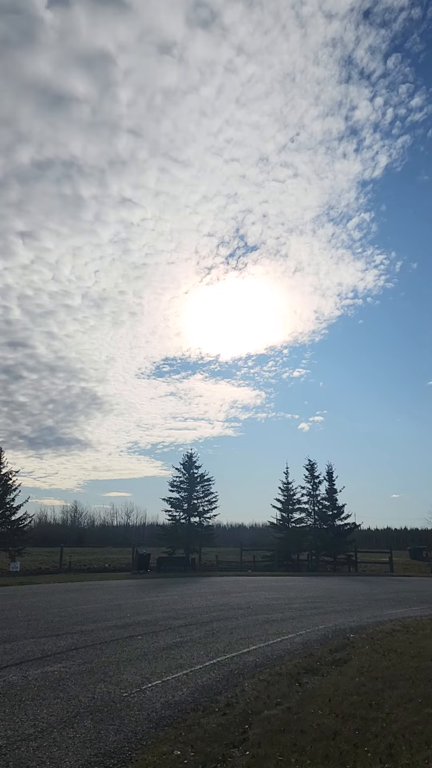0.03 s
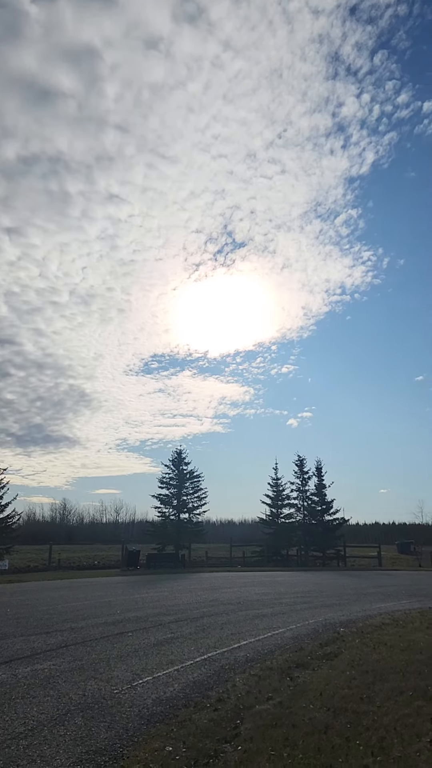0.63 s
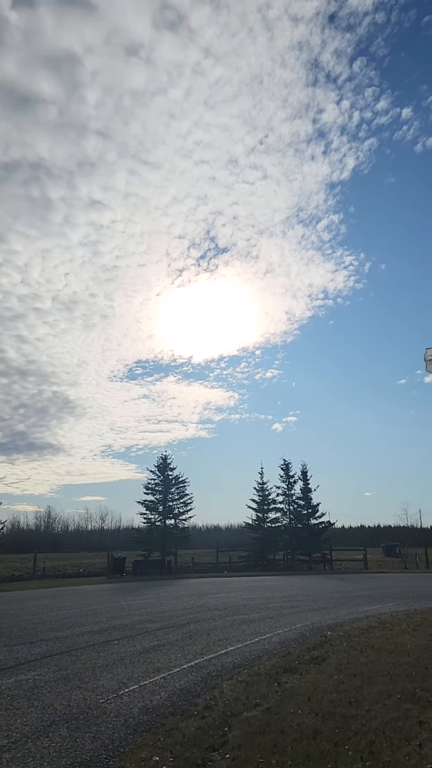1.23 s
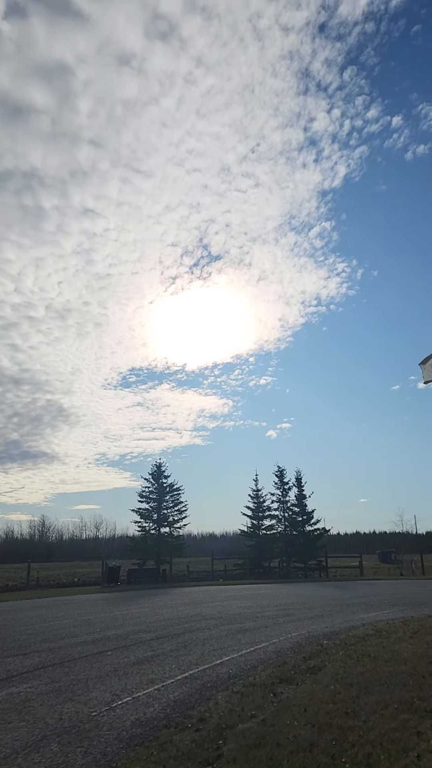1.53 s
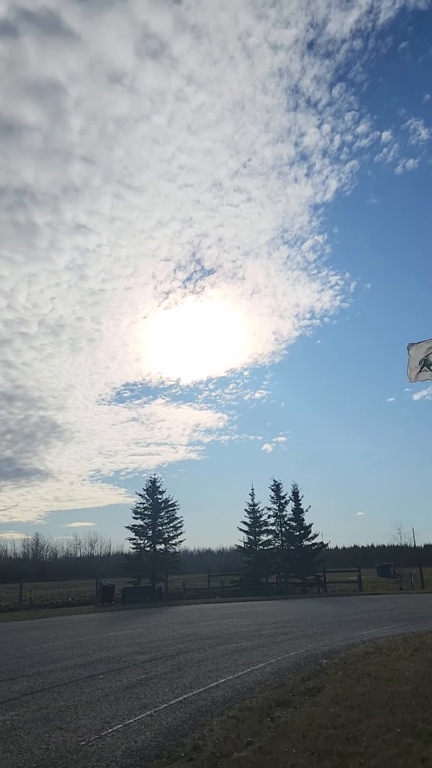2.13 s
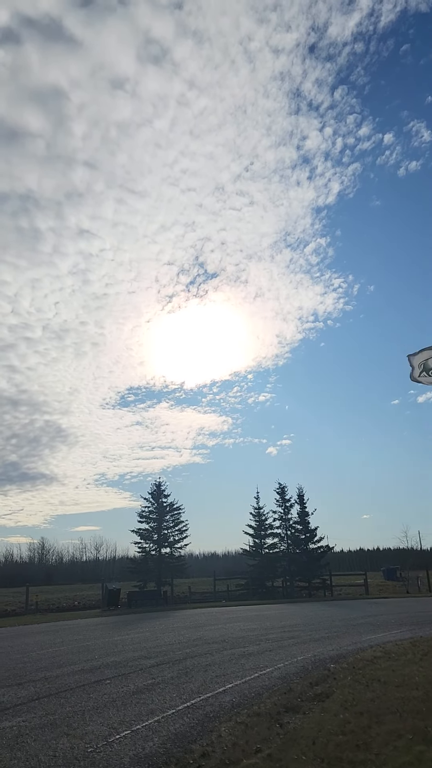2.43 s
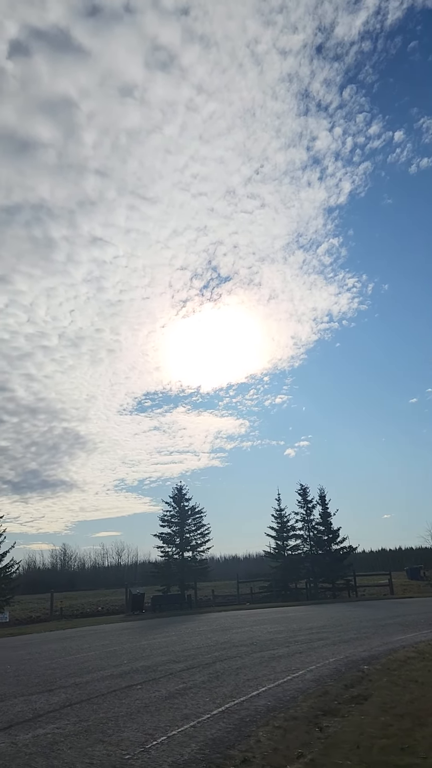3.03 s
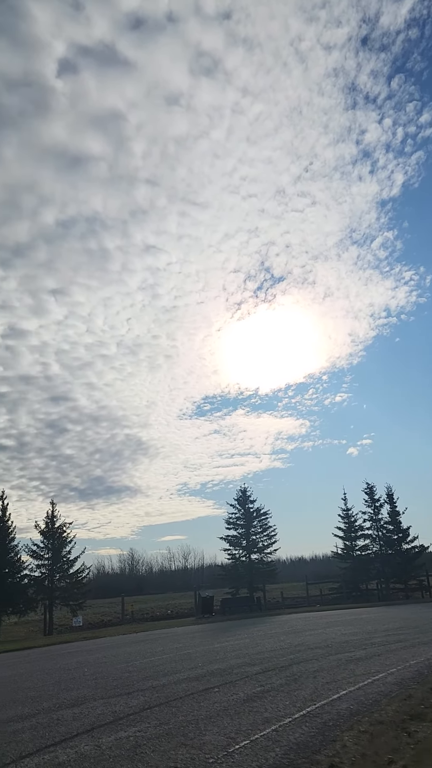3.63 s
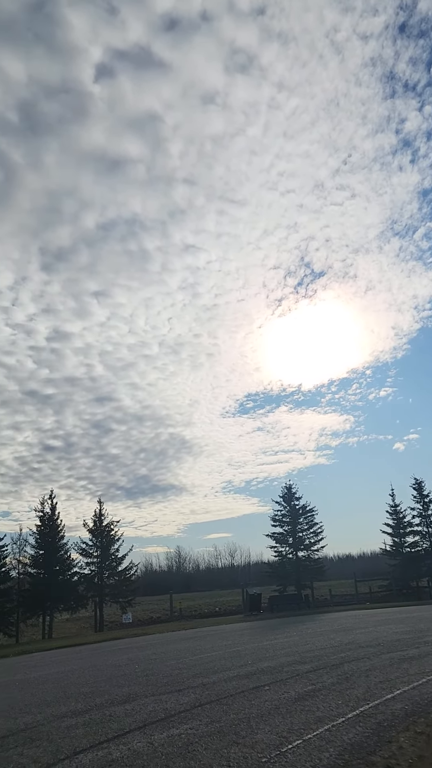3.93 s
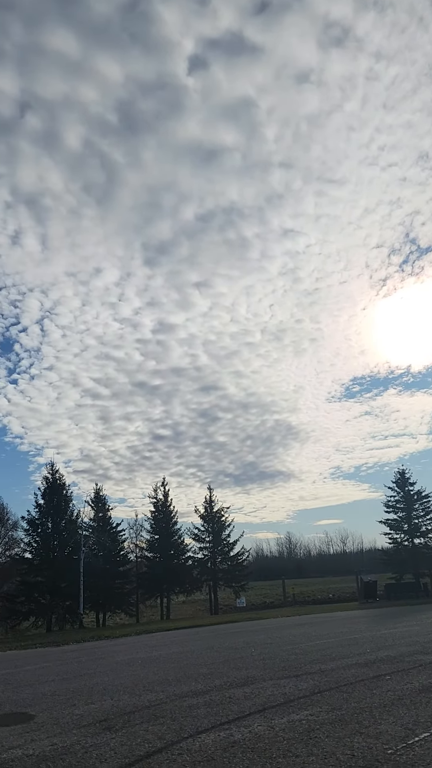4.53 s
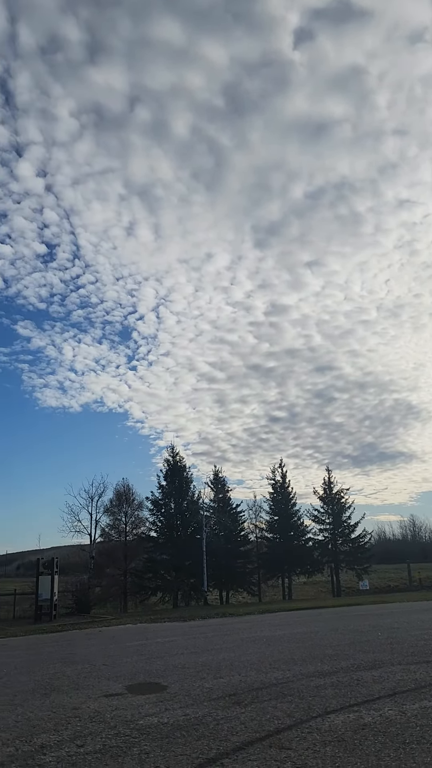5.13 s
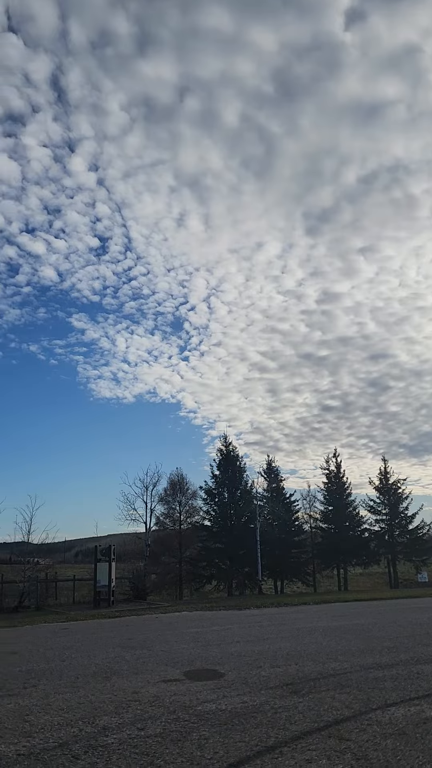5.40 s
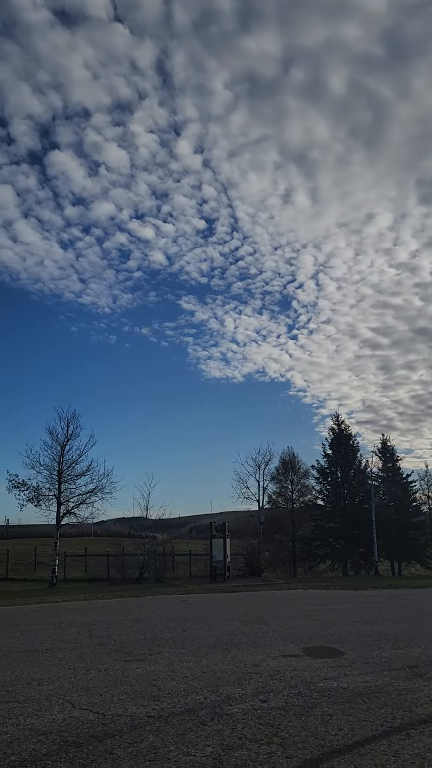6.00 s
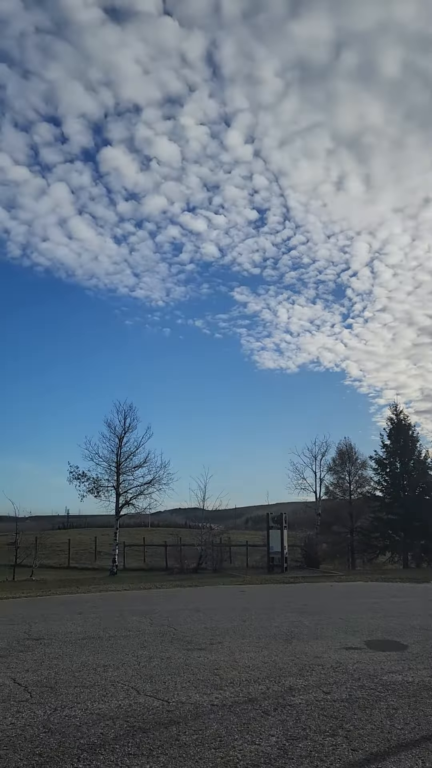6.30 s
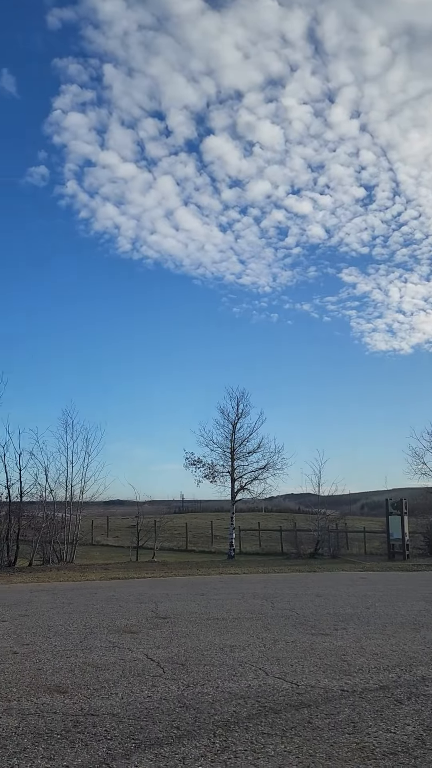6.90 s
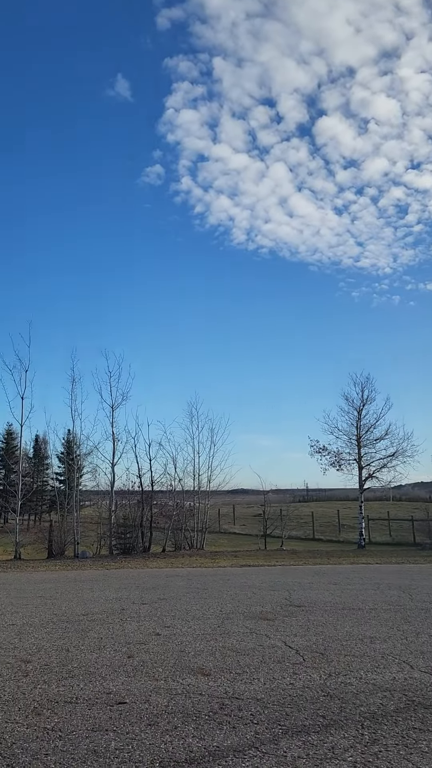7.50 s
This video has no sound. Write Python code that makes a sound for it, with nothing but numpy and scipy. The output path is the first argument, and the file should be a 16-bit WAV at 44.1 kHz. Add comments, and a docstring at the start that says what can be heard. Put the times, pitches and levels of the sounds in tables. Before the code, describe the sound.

Outdoors in open country, low gusty wind buffets a handheld microphone while a rope and its clips keep knocking against a metal flagpole nearby. The strikes come unevenly, several a second, some sharp and ringing, others light taps, and they grow sparser near the end. Dull handling thumps come early, a dry tap on the device follows midway, and clothing rustles and ticks softly right beside the microphone.

```python
"""Metal clips on a wind-swung halyard clank against a hollow metal flagpole a few metres off.
Each strike rings the tube's modes, with a clink, a hollow knock and a dry crack; the slack rope taps
in between. The phone turns away from the pole while gusts rumble on its ports. Close by, fingers bump
and tap the case and cloth rustles and ticks. A faint hush of wind lies over the open field."""
import sys
import numpy as np
from scipy import signal
from scipy.fft import rfft, irfft, next_fast_len
from scipy.io import wavfile
from scipy.ndimage import uniform_filter1d

SR = 44100
rng = np.random.default_rng(int(sys.argv[2]) if len(sys.argv) > 2 else 0)


def write(x):
    x = np.atleast_2d(x).T
    wavfile.write(sys.argv[1], SR, np.round(np.clip(x, -1, 1) * 32767).astype(np.int16))


N = 341775
TIME_S = np.arange(N) / SR


def undb(db):
    """Decibels to gain."""
    return 10 ** (np.asarray(db) / 20)


def unit(x):
    """Scale to rms 1."""
    return x / np.sqrt(np.mean(x ** 2))


def curve(table, column=1):
    """Table column, linear in time."""
    return np.interp(TIME_S, np.array(table)[:, 0], np.array(table)[:, column])


def at_hz(table, hz, column=1):
    """Table column, read on a log-frequency axis."""
    return np.interp(np.log(hz + 1), np.log(np.array(table)[:, 0]), np.array(table)[:, column])


def colour(x, spectrum):
    """Filter by (frequency [Hz], level [dB]) points, then scale to rms 1."""
    size = next_fast_len(x.shape[-1])
    gain = undb(at_hz(spectrum, np.fft.rfftfreq(size, 1 / SR)))
    return unit(irfft(rfft(x, size) * gain, size)[..., :x.shape[-1]])


def pan(db):
    """Stereo gains for a left-minus-right level."""
    return unit(undb(np.array([[db], [-db]]) / 2))


def port_noise(side_db, size=N):
    """Noise at two ports: shared part plus opposed part."""
    mid, side = rng.standard_normal((2, size))
    return unit(mid + undb(side_db) * side * np.array([[1], [-1]]))


def wander(rate_hz):
    """Smooth random drift, rms 1."""
    hold = max(int(SR / rate_hz), 1)
    steps = np.repeat(rng.standard_normal(N // hold + 1), hold)
    return unit(uniform_filter1d(steps, hold)[:N])


def add(out, at_s, sound):
    """Mix a sound in at a given time."""
    start = max(int(at_s * SR), 0)
    out[:, start:start + sound.shape[1]] += sound[:, :N - start]


# wind at the ports: (time [s], rumble level [dB], flutter level [dB])
GUSTS = [(0.3, -41, -55), (0.36, -47, -54), (0.82, -42, -61), (0.92, -51, -62), (1.0, -40, -57),
         (1.23, -38, -57), (1.3, -44, -63), (1.38, -32, -58.5), (1.44, -36.5, -57), (1.56, -35.5, -58),
         (1.92, -52, -56), (1.98, -34.5, -56), (2.19, -49, -53.5), (2.42, -38, -53.5), (2.75, -44, -58.5),
         (2.79, -37.5, -54.5), (3.1, -39.5, -58), (3.47, -41.5, -58), (3.6, -32, -60.5),
         (3.83, -44.5, -59.5), (4.1, -34.5, -57), (4.4, -37.5, -55.5), (4.55, -37.5, -54.5),
         (4.8, -37, -58), (4.99, -35, -58.5), (5.49, -47, -59), (5.51, -35, -60.5), (5.74, -39, -55),
         (5.78, -40, -60.5), (6.3, -37, -53.5), (6.46, -43, -65), (6.5, -43, -57), (6.72, -40, -58),
         (6.88, -47, -57.5), (7.15, -40, -60), (7.62, -43, -60.5), (7.65, -47.5, -63), (7.75, -46, -49)]
# spectra of rumble, flutter and field hush: (frequency [Hz], level [dB])
RUMBLE_SPECTRUM = [(12, -64), (20, -8.5), (43, 0.5), (72, 2), (126, -6.5), (200, -22), (260, -36),
                   (440, -120)]
FLUTTER_SPECTRUM = [(60, 0.5), (130, -4), (200, -5.5), (300, -8.5), (450, -13.5), (800, -15.5), (2000, -76)]
FIELD_SPECTRUM = [(100, 9), (300, 3), (600, 1.5), (1150, 2.5), (1800, -4), (2700, -12.5), (4000, -16.5),
                  (6000, -18), (10000, -28), (16000, -35)]


def wind(eddy_db=1.3, flutter_lift_db=5.0, field_db=-57.0):
    """Eddies rumble on the ports, rougher flutter above; the field hushes behind."""
    rumble = colour(port_noise(-17), RUMBLE_SPECTRUM)
    rumble *= undb(curve(GUSTS) + eddy_db * wander(9))
    flutter = colour(port_noise(-17), FLUTTER_SPECTRUM)
    flutter *= undb(curve(GUSTS, column=2) + flutter_lift_db + 2.87 * wander(35))
    field = colour(port_noise(-6.5), FIELD_SPECTRUM) * undb(field_db + wander(2.77))
    return rumble * pan(-0.48) + flutter * pan(-0.62) + field


# finger bumps: (time [s], level [dB], length [s], centre [Hz])
BUMPS = [(0.162, -24.5, 0.059, 85.5), (0.165, -40, 0.0071, 547), (0.18, -44, 0.036, 605),
         (0.185, -36.5, 0.036, 230), (0.232, -23.5, 0.034, 83.5), (0.253, -35.5, 0.033, 293),
         (1.43, -44, 0.057, 198), (1.563, -34, 0.0053, 750), (1.952, -36, 0.018, 290),
         (1.974, -25.5, 0.014, 89), (2.024, -31, 0.01, 453)]
# thud spectrum: (frequency [x centre], level [dB])
THUD_SPECTRUM = [(.2, -18), (.7, 0), (1.3, 0), (2.6, -17), (8, -36), (30, -76)]


def bumps(rise_s=0.0035):
    """Fingers shift on the case in short, dull thuds."""
    out = np.zeros((2, N))
    t = np.arange(8192) / SR
    for at_s, db, length_s, hz in BUMPS:
        spectrum = [(hz * ratio, gain_db) for ratio, gain_db in THUD_SPECTRUM]
        thud = colour(port_noise(-6, len(t)), spectrum)
        thud /= np.std(thud[:, :int(length_s * SR)])
        envelope = (1 - np.exp(-t / rise_s)) * np.exp(-(t / length_s) ** 2)
        add(out, at_s, thud * envelope * undb(db))
    return out * pan(-8.5)


def rope_taps(count=30, tap_db=-66, spread_db=8, hardness_db_oct=-1.4, clink_db=-1, sustain=1.0):
    """The slack rope keeps tapping the pole lightly; rows as in STRIKES."""
    chance = rng.random((count, 2))
    times_s = (np.arange(count) + chance[:, 0]) / count * N / SR
    strength_db = tap_db + spread_db * (chance[:, 1] - .5)
    contact = np.tile([hardness_db_oct, clink_db, 0, sustain, 0, 0], (count, 1))
    return np.column_stack([times_s, strength_db, contact])


# pole bearing as the phone turns: (time [s], left lead [ms], left minus right [dB])
BEARING = [(0, 0.077, -1), (2.2, 0.063, -2.5), (3.6, 0.11, -1.5), (4.3, 0.11, -2.5), (5.3, 0.29, -1.5),
           (7.7, 0.26, 2.5)]


def lead_s(times_s):
    """Head start of the pole's sound at the left port."""
    return np.interp(times_s, *np.transpose(BEARING)[:2]) / 1000


def port_times(t, at_s):
    """Left and right time axes for a pole sound."""
    return t + np.array([[lead_s(at_s)], [0]])


def pole_pan():
    """Stereo gains of the pole as the phone turns."""
    gains = undb(np.array([[.5], [-.5]]) * curve(BEARING, column=2))
    return gains / np.sqrt(np.mean(gains ** 2, axis=0))


# a strike's share per register: (centre [Hz], level [dB], clink gain [dB/dB], force gain [dB/dB])
REGISTER_SHARES = [(1360, -1.57, 0.5, -0.0161), (1820, 0, 0.72, 0.19), (3570, 3, 1, 0.1063),
                   (6800, -1.4, 0.27, 0.01), (12100, -11.5, -0.07, 0.14)]
PIVOT_HZ, FIRM_DB = 2600, -47  # pivot of the hardness tilt; strength of a firm strike


def register_db(register, strength_db, hardness_db_oct, clink_db):
    """Level of one register: hard, strong strikes are brighter; square hits clink more."""
    hz, db, clink_gain, force_gain = REGISTER_SHARES[register]
    tilt_db = hardness_db_oct * np.log2(hz / PIVOT_HZ)
    return strength_db + db + tilt_db + clink_gain * clink_db + force_gain * (strength_db - FIRM_DB)


def mode_weights(hz, db, times_s, scatter_db=1.5, ripple_db=5.0, ripple_hz=100, diffuse_db=-1):
    """Complex drive of the pole's modes: strikes x ports x modes."""
    chance = rng.standard_normal((len(times_s), 7, len(hz)))
    # the contact point favours clusters of modes, short waves most
    near = np.exp(-((hz[:, None] - hz) / ripple_hz) ** 2)
    ripple = chance[:, 6] @ (near / np.linalg.norm(near, axis=0))
    gain = undb(db + scatter_db * chance[:, 1] + ripple_db * ripple * np.minimum(hz / 3000, 1))
    lead = np.exp(-2j * np.pi * np.outer(lead_s(times_s), hz))
    direct = np.exp(2j * np.pi * chance[:, :1]) * np.stack([lead, np.ones_like(lead)], axis=1)
    # scattering round the phone decorrelates the treble
    scattered = undb(diffuse_db) * np.sqrt(hz / 6000) * (chance[:, 2:4] + 1j * chance[:, 4:6])
    return (direct + scattered) * gain[:, None]


# clips striking the pole: (time [s], strength [dB], hardness [dB/oct], extra clink [dB],
# clip pitch [Hz], sustained share [0-1], favoured pole note [Hz], note lift [dB])
STRIKES = [(.353, -48.5, -0.5, 1.5, 3920, 0.4, 2240, 9.5), (0.456, -67, -3.5, 7, 4260, 0, 1165, 20),
           (.479, -48.5, -2.5, -3, 4510, 0.62, 1540, 4), (.636, -55.5, -0.7, -0.5, 3720, 0.4, 2004, 16.5),
           (.732, -55.5, 2, 1.5, 3390, 0.24, 1946, 14), (.821, -61, -5, 1, 4330, 0.9, 1450, 3),
           (0.9748, -42, 1.9, -1.5, 3350, 0.51, 1167, 6), (1.195, -58, -1.5, -6, 3400, 0.7, 1224, 11),
           (1.228, -49, 2, -1, 3570, .34, 2080, 8), (1.495, -58.5, -4, 3.5, 3600, 0.8, 2137, 11),
           (1.632, -60, 2, 4, 4230, 0.7, 2370, -2), (1.6767, -37.5, 0.5, -5.5, 3610, 0.52, 1960, 6.5),
           (1.873, -61.5, -10, 2.5, 3650, 0.5, 1220, 7), (2.112, -31.5, 1.1, -3, 3455, 0.2, 2094, 5.5),
           (2.2503, -43, -0.8, 0, 3700, 0.3, 1882, 13), (2.297, -41.5, 0.5, -0.5, 3880, 0.36, 1160, 6),
           (2.375, -51.5, -2.5, -2, 3800, 0.27, 2090, 22.5), (2.571, -50, -3, 4, 3840, 0.33, 1023, 6),
           (3.151, -51, -4, -3, 3810, 1, 1080, 2), (3.172, -50.5, 2, -1.5, 3700, 0.3, 1370, -4),
           (3.216, -46, 0.5, -2, 4040, 0.45, 1285, 7), (3.28, -46, -0.5, -2.5, 4200, 0.22, 1245, 12.5),
           (3.339, -57.5, -2.5, 4, 4080, 0.8, 1230, -2), (3.486, -54.5, -4, -0.5, 4020, 0.3, 1316, 12),
           (3.75, -45.5, 0, 4.5, 3530, 0.25, 1194, 7), (3.853, -49.5, -0.5, 1, 3740, 0.4, 1213, 3),
           (3.868, -47.5, 1, -4, 3530, 0.25, 1200, 6), (3.988, -47, 1.5, 3, 3600, 0.13, 980, 5),
           (4.096, -51.5, 2, 6.5, 3390, 0.3, 1553, 14), (4.146, -58.5, -0.5, 8.5, 3320, 0.76, 1180, 4),
           (4.167, -59.5, -1, 5, 3370, 0.3, 1180, -9), (4.185, -47.5, 2, 1, 3660, 0.17, 1120, 8),
           (4.323, -62.5, -3, 5, 3450, 1, 1418, 13.5), (4.57, -62, -2, 6.5, 3620, 0, 1187, 15),
           (4.673, -67, 1, 10.5, 3530, 0, 2085, 19), (4.841, -68, -9, 2, 3900, 0.2, 1220, 4),
           (4.864, -63, -4.5, 0, 3350, 0.9, 2000, 7), (4.991, -48, -2, 0, 3760, 0.25, 984, 10.5),
           (5.052, -59, -4.5, 5.5, 3480, 0.7, 2560, 12), (5.107, -56, -1.5, 1.5, 3390, 0, 1490, 15),
           (5.357, -42, -3, -3, 3620, 0, 1643, 10.5), (5.368, -59, -4, -12, 3650, 0, 1630, 6),
           (5.406, -56, 2.5, 6.5, 3590, 0.06, 1320, 8), (5.444, -53, -0.5, 1, 3640, 0, 1800, 10),
           (5.569, -62.5, -8, 2, 3670, 0.4, 1080, 4), (5.587, -44.5, -4, -7.5, 4220, 0, 1060, 13),
           (5.647, -58.5, -4.5, 3, 3860, .2, 1020, -5), (5.822, -59.5, 0.5, 1, 3780, 0.15, 1130, 5),
           (5.923, -61.5, 2, -5, 3780, 0.97, 1164, 16), (6.076, -59, -9, 5.5, 3300, 0.04, 1180, -5),
           (6.159, -42, -2, -4.5, 3410, 0.22, 1176, 11.5), (6.263, -58, -6, -1, 3880, 0.2, 1130, -3),
           (6.348, -73.5, 0, 7.5, 4070, 0.4, 2455, 21), (6.502, -68, -6.5, 12.5, 3300, 0, 1415, 15),
           (6.548, -62, -5.5, 7, 3310, 0.26, 1400, 6), (7.102, -50.5, -2.5, -1.5, 3920, 0.8, 2340, 5),
           (7.164, -63.5, -2, 8.5, 3540, .6, 2530, -2), (7.189, -55, -5, 4.5, 3530, 0.44, 2560, 8.5),
           (7.261, -63.5, 1, 8.5, 3300, 0.8, 1200, 0), (7.637, -48.5, -1, 0, 3550, 0.1, 1640, 3)]
# registers for tube ring, clank, clip ring, bright contact, sizzle: (from [Hz], to [Hz])
REGISTERS = [(400, 1700), (1700, 2700), (2700, 5000), (5000, 9000), (9000, 16500)]
# clear modes of pole and clips: (frequency [Hz], level [dB], t60 [s])
POLE_MODES = [(516, -10, .6), (667, -15, .8), (839, -7, .8), (957, -8, .6), (1026, -3, .7), (1122, -7, 1.1),
              (1143, -2.5, 1.15), (1209, -3.5, 1.3), (1236, -8, 1.2), (1298, -6.5, 1.2), (1423, -6, 1.2),
              (1482, -4, 1.1), (1555, -8, .7), (1657, -9, .5), (1914, 1, .4), (1958, -1, .3),
              (2010, -2, .35), (2109, 2, .42), (2172, -2, .4), (2290, -6, .3), (2538, -7, .25),
              (2947, 3, .2), (3008, 5, .22), (3290, 2, .2), (3457, 5, .3), (3550, 3, .25), (3623, 2, .27),
              (3855, 0, .3), (4432, 5, .25), (4512, 1, .22), (7681, -7, .22)]
# contour of the crowded shell modes: (frequency [Hz], relative level [dB], t60 [s])
SHELL_CONTOUR = [(800, -18, .78), (1220, -12.5, 0.97), (2220, -5.5, 0.59), (2500, -9, 0.53),
                 (3200, -5, 0.25), (3240, 3.5, 0.42), (4080, 0, 0.46), (4920, -6, 0.23),
                 (5640, -10.5, 0.13), (5620, -12.5, 0.18), (7300, -11.5, 0.24), (7950, -16.5, 0.26),
                 (9970, -22.5, 0.18), (12300, -19, 0.23), (15850, -30, .16)]


def pole(shell_count=1100, drain_s=0.04, build_cycles=1.8, contact_s=0.0004, note_width_hz=50):
    """Every blow rings the same modes, in a mix set by where it lands."""
    t = np.arange(SR, dtype=np.float32) / SR
    spread = (np.arange(shell_count) + rng.random(shell_count)) / shell_count
    shell_hz = 700 + 15100 * spread ** 1.6
    shell_db = at_hz(SHELL_CONTOUR, shell_hz) - 5
    shell_t60_s = at_hz(SHELL_CONTOUR, shell_hz, column=2)
    modes = np.vstack([POLE_MODES, np.column_stack([shell_hz, shell_db, shell_t60_s])])
    blows = np.vstack([STRIKES, rope_taps()])
    times_s, strength_db, hardness_db_oct, clink_db, _, sustain, note_hz, note_db = blows.T
    sustain = np.float32(sustain)[:, None, None]
    out = np.zeros((2, N))
    for register, (low_hz, high_hz) in enumerate(REGISTERS):
        hz, db, t60_s = modes[(modes[:, 0] >= low_hz) & (modes[:, 0] < high_hz)].T
        age_s = t[:int(t60_s.max() * SR)]
        phase = np.outer(np.float32(2 * np.pi * hz), age_s)
        fade = np.exp(np.outer(np.float32(-np.log(1000) / t60_s), age_s))
        # modes near the favoured note stand out and raise their register
        lift_db = note_db[:, None] * np.exp(-((hz - note_hz[:, None]) / note_width_hz) ** 2)
        levels_db = register_db(register, strength_db, hardness_db_oct, clink_db)
        levels_db += 10 * np.log10(np.mean(undb(lift_db) ** 2, axis=1))
        weights = np.complex64(mode_weights(hz, db + lift_db, times_s)).reshape(-1, len(hz))
        waves = np.vstack([fade * np.cos(phase), fade * np.sin(phase)])
        rings = np.hstack([weights.real, weights.imag]) @ waves
        # slow, low bending waves build later; the first loud ring drains into the rope
        build = 1 - np.exp(-age_s / float(contact_s + build_cycles / np.sqrt(low_hz * high_hz)))
        drain = sustain + (1 - sustain) * np.exp(-age_s / drain_s)
        rings = rings.reshape(len(blows), 2, -1) * (build * drain)
        for at_s, level_db, ring in zip(times_s, levels_db, rings):
            onset_rms = np.std(ring[:, :int(.04 * SR)])
            add(out, at_s, ring * (undb(level_db) / onset_rms))
    return out


# partials of a clip: (frequency [x pitch], level [dB])
CLIP_PARTIALS = [(1, 2), (1.521, -27), (2.06, -32)]


def clips(decay_s=0.0072, rise_s=0.0023, gain_db=12.0):
    """Each clip gives its own short clink, soon choked by the rope."""
    out = np.zeros((2, N))
    t = np.arange(4096) / SR
    envelope = (1 - np.exp(-t / rise_s)) * np.exp(-t / decay_s)
    for at_s, strength_db, hardness_db_oct, clink_db, hz, *_ in STRIKES:
        phase = 2 * np.pi * hz * port_times(t, at_s)
        clink = sum(undb(db) * np.sin(ratio * phase) for ratio, db in CLIP_PARTIALS)
        level_db = register_db(2, strength_db, hardness_db_oct, clink_db) + gain_db
        add(out, at_s, clink * envelope * undb(level_db))
    return out * pan(-6.2)


def knocks(decay_s=0.016, rise_s=0.0015, lift_gain=0.87):
    """The tube's favoured note leaps out briefly as a hollow knock."""
    out = np.zeros((2, N))
    t = np.arange(4096) / SR
    envelope = (1 - np.exp(-t / rise_s)) * np.exp(-t / decay_s)
    for at_s, strength_db, hardness_db_oct, clink_db, _, _, note_hz, lift_db in STRIKES:
        note = np.sin(2 * np.pi * note_hz * port_times(t, at_s))
        level_db = register_db(0, strength_db, hardness_db_oct, clink_db) + lift_gain * lift_db
        add(out, at_s, note * envelope * undb(level_db))
    return out


# crack of a hard contact: (frequency [Hz], level [dB])
CRACK_SPECTRUM = [(400, -23), (1100, -8), (2000, -2), (2800, 15), (4200, 11.5), (6000, -10), (9500, -10),
                  (13000, -3), (16000, -11)]


def cracks(gain_db=-9, force_gain=0.66, rise_s=0.00099, decay_s=0.017, tail_share=0.3, tail_s=0.038):
    """A clip landing hard chatters in a dry crack, whose level grows faster than the blow's."""
    envelope = np.zeros((2, N))
    t = np.arange(12288) / SR
    shape = (1 - np.exp(-t / rise_s)) * (np.exp(-t / decay_s) + tail_share * np.exp(-t / tail_s))
    for at_s, strength_db, *_ in STRIKES:
        level_db = strength_db + gain_db + force_gain * (strength_db - FIRM_DB)
        add(envelope, at_s, shape[None] * undb(level_db))
    chatter = colour(port_noise(-2), CRACK_SPECTRUM) * undb(3.0 * wander(700))
    return envelope * chatter


def yard(x, echo_db=-18, t60_s=0.99, rise_s=0.0028):
    """Ground, fence and trees scatter each clank into a faint diffuse tail."""
    t = np.arange(SR // 2) / SR
    tail = colour(rng.standard_normal((2, len(t))), [(1000, 5), (4000, -3), (12000, -3)])
    tail *= (1 - np.exp(-(t / rise_s) ** 2)) * np.exp(-np.log(1000) * t / t60_s)
    tail *= undb(echo_db) / np.linalg.norm(tail[0])
    return x + signal.fftconvolve(x, tail, axes=1)[:, :N]


# creases snapping: (time [s], level [dB], centre [Hz], decay [s])
CREASES = [(0.402, -41, 3860, .002), (1.4434, -42.5, 7430, .002), (1.994, -35.5, 4830, 0.0023),
           (2.714, -42, 6330, .002), (2.808, -31, 8500, 0.00091), (2.949, -34.5, 12100, 0.0011),
           (2.004, -46, 9000, .0015), (2.681, -40, 6500, .0015), (2.767, -42, 11000, 0.00074),
           (3.04, -45.5, 11160, 0.0025), (3.814, -40, 7560, 0.0018), (3.968, -44, 6370, 0.00074),
           (4.0153, -30, 4420, .0016), (4.7412, -44, 8100, 0.0016), (4.753, -51, 7500, 0.0016),
           (6.446, -46, 5460, 0.00069), (6.634, -49.5, 7950, 0.0031), (6.962, -45.5, 7500, 0.0013),
           (7.016, -58, 8000, .0015), (7.0654, -36.5, 6900, 0.0026), (7.151, -48, 5800, .001),
           (7.377, -53, 7000, .003), (7.404, -44, 7300, 0.0061), (7.472, -44, 9000, 0.0026),
           (7.5628, -27.5, 5500, 0.0032), (7.6085, -34, 5500, 0.003)]


def creases(gain_db=-1):
    """Cloth creases snap in short ticks."""
    out = np.zeros((2, N))
    t = np.arange(1024) / SR
    for at_s, db, hz, decay_s in CREASES:
        spectrum = [(hz / 6, -22), (hz / 1.4, -13), (hz, 0),
                    (hz * 1.3, -10), (hz * 3, -16), (hz * 8, -40)]
        snap = colour(port_noise(-1, len(t)), spectrum)
        add(out, at_s, snap * np.exp(-t / decay_s) * undb(db + gain_db))
    return out * pan(-16)


# cloth rubs: (peak time [s], hold [s], rise [s], fall [s], level [dB], tilt above 1 kHz [dB/oct])
RUBS = [(0.72, 0.18, .05, 0.099, -63.5, -3), (1.428, 0.25, 0.064, 0.048, -57, 0.6),
        (1.994, .02, 0.033, 0.36, -58.5, -2), (2.498, 0.018, 0.027, 0.058, -43.5, -1),
        (2.643, 0.04, 0.025, 0.099, -49, 3), (2.76, 0.085, 0.03, 0.09, -65, 12.5),
        (3.148, 0.059, 0.28, 0.27, -53, -7.5), (3.623, 0.062, 0.012, 0.038, -63, 0),
        (3.73, 0.066, 0.037, 0.01, -43, 2.2), (3.85, 0.069, .04, 0.068, -55.5, 0),
        (4.246, 0.034, 0.035, 0.026, -46.5, 4.5), (4.461, 0.027, 0.022, 0.008, -43, 3),
        (4.523, 0.057, 0.017, 0.07, -67, 0.5), (6.35, 0.41, 0.26, 0.15, -66, -1.3),
        (7.163, 0.12, 0.077, 0.032, -58.5, -1.5), (7.59, 0.14, 0.19, 0.34, -49.5, -1.8)]
# rustle spectrum: (frequency [Hz], level [dB])
CLOTH_SPECTRUM = [(600, -22), (1600, 4.5), (2900, -3.5), (4300, 3.5), (5600, -3), (8000, 2.5), (9800, -6),
                  (12500, 0), (15500, -4.5)]


def cloth(grain_db=2.0, catches_per_s=110, catch_db=13.5, catch_s=0.00091, rest_db=-82, patchy_db=0.26):
    """Threads slip in tiny grains, some catch and crackle; each rub swells the rustle."""
    grains = rng.standard_normal((2, N)) * undb(grain_db * (wander(900) + wander(70)))
    catches = (rng.random(N) < catches_per_s / SR) * rng.random(N) * undb(catch_db)
    catch_envelope = signal.lfilter([1], [1, -np.exp(-1 / (catch_s * SR))], catches)
    crackle = catch_envelope * rng.standard_normal((2, N))
    rustle = colour(grains + crackle, CLOTH_SPECTRUM)
    out = rustle * undb(rest_db)
    for at_s, hold_s, rise_s, fall_s, db, tilt_db_oct in RUBS:
        rub = colour(rustle, [(1000, 0), (16000, 4 * tilt_db_oct)])
        before, after = (at_s - TIME_S) / rise_s, (TIME_S - at_s - hold_s) / fall_s
        swell = np.exp(-np.maximum(np.maximum(before, after), 0))
        out += rub * undb(db) * swell
    return out * undb(patchy_db * wander(15)) * pan(-12.5)


# single eddies: (time [s], level [dB], half length [s])
BUFFETS = [(2.295, -50, 0.0096), (2.491, -46.5, .012), (2.83, -52, 0.016), (2.942, -47, 0.01),
           (3.203, -49, 0.015), (3.76, -52, 0.0085), (4.324, -55, 0.018), (4.56, -54, 0.013),
           (4.64, -57, 0.0079), (4.996, -44.5, 0.015), (6.194, -58.5, 0.08), (6.302, -57, 0.076),
           (6.653, -57, 0.013)]
# eddy spectrum: (frequency [Hz], level [dB])
BUFFET_SPECTRUM = [(70, -10), (170, 7.5), (300, -2), (520, -9), (800, -17), (2000, -37)]


def buffets():
    """Single eddies hit the ports in short, rough puffs."""
    puffs = sum(undb(db) * np.exp(-((TIME_S - at_s) / half_s) ** 2) for at_s, db, half_s in BUFFETS)
    return colour(port_noise(-19), BUFFET_SPECTRUM) * puffs


# modes of the case: (frequency [Hz], level [dB], decay [s])
CASE_MODES = [(860, -5, 0.0022), (1310, -8, 0.0012), (1800, 1, 0.0012), (3320, -17, 0.0006)]


def case_tap(at_s=2.9953, level_db=-34):
    """A fingernail rings the case in one sharp, dry tap."""
    out = np.zeros((2, N))
    t = np.arange(1024) / SR
    ring = sum(undb(db) * np.sin(2 * np.pi * hz * t) * np.exp(-t / decay_s)
               for hz, db, decay_s in CASE_MODES)
    add(out, at_s, ring * undb(level_db) * pan(-4))
    return out


# clip dragging on the pole: (time [s], level [dB], pitch [Hz], half length [s])
SQUEAKS = [(5.3624, -28, 3620, 0.004), (5.3755, -35, 3550, 0.0025), (5.408, -28.5, 3570, 0.0019)]


def squeaks(rough_rad=0.14):
    """A clip drags on the metal in tiny squeaks that swell and stop."""
    out = np.zeros((2, N))
    t = np.arange(-1024, 1024) / SR
    for at_s, db, hz, half_s in SQUEAKS:
        slip = rough_rad * unit(uniform_filter1d(rng.standard_normal(len(t)), size=40))
        tone = np.sin(2 * np.pi * hz * port_times(t, at_s) + slip)
        add(out, at_s + t[0], tone * np.exp(-(t / half_s) ** 2) * undb(db))
    return out


def scene():
    """Flagpole in its yard, wind, and small noises at the phone."""
    flagpole = (pole() + clips() + knocks() + cracks() + squeaks()) * pole_pan()
    return yard(flagpole) + wind() + buffets() + cloth() + creases() + case_tap() + bumps()


def record(dry, open_s=0.1494, fade_s=0.012, low_hz=27, top_hz=15900):
    """The microphone opens after a moment, thins the deepest rumble and cuts the top."""
    opened = np.clip((TIME_S - open_s) / fade_s, 0, 1)
    thinned = signal.sosfilt(signal.butter(2, low_hz, "high", fs=SR, output="sos"), dry * opened)
    return signal.sosfilt(signal.ellip(10, .2, 80, top_hz, fs=SR, output="sos"), thinned)


dry = scene()
out = record(dry)
write(out)
```